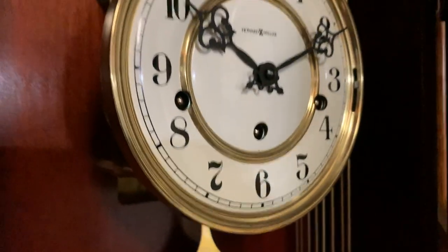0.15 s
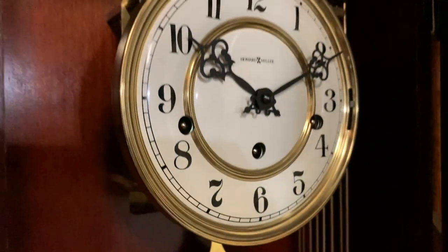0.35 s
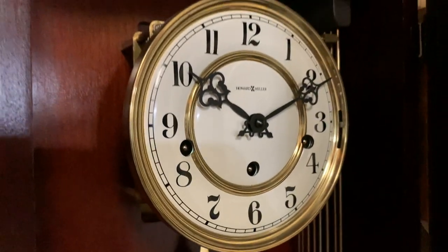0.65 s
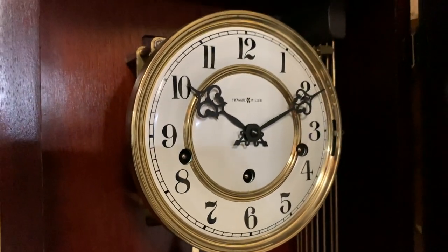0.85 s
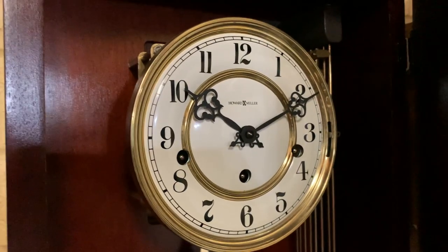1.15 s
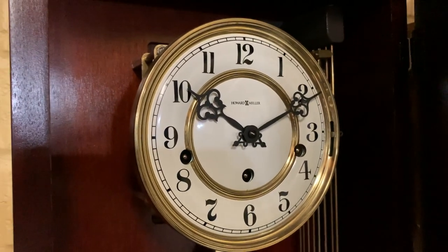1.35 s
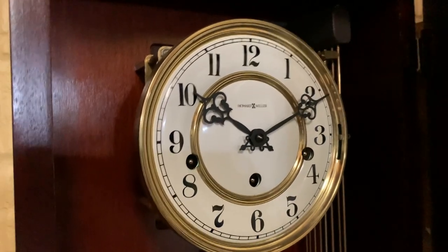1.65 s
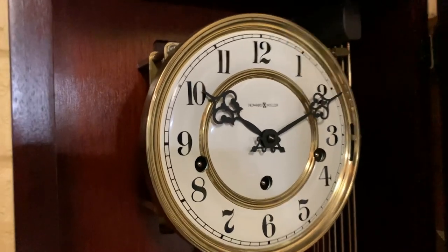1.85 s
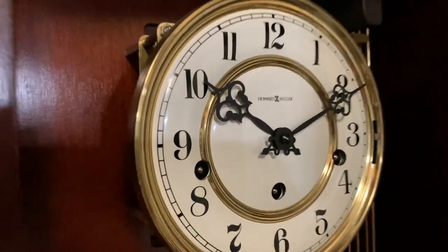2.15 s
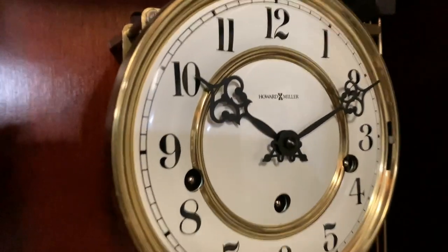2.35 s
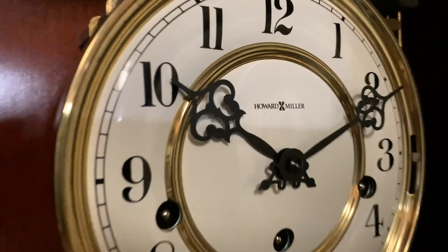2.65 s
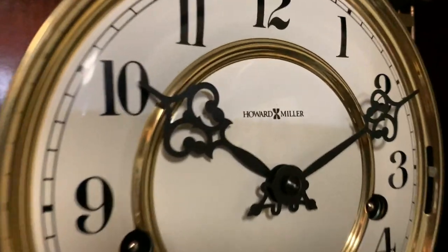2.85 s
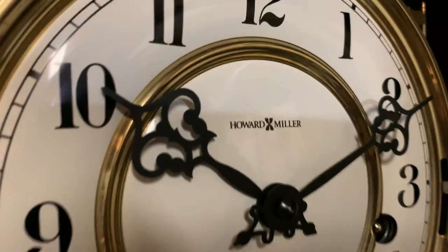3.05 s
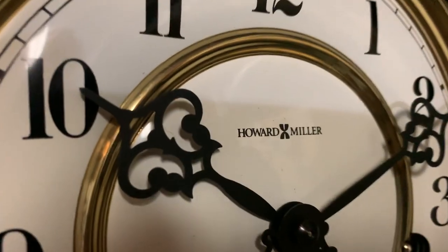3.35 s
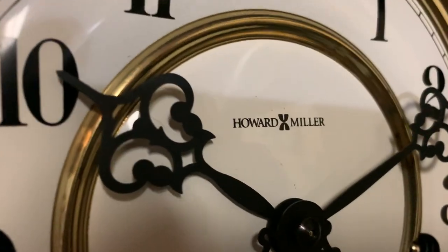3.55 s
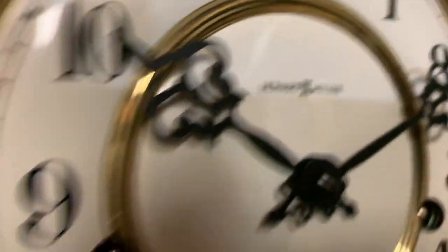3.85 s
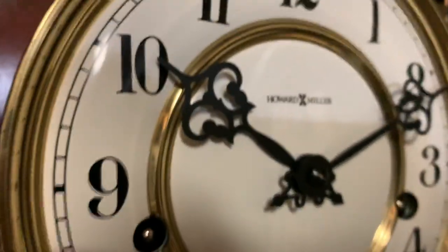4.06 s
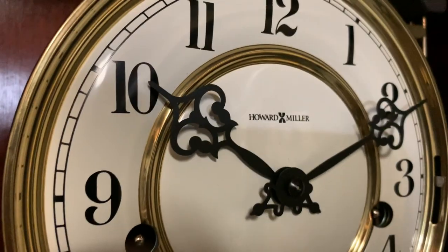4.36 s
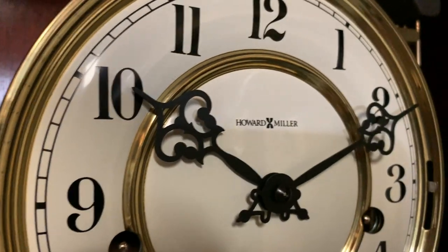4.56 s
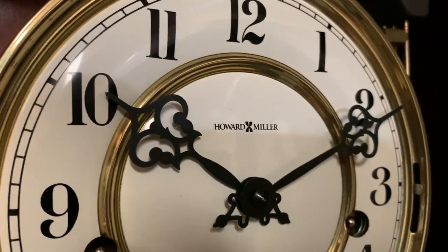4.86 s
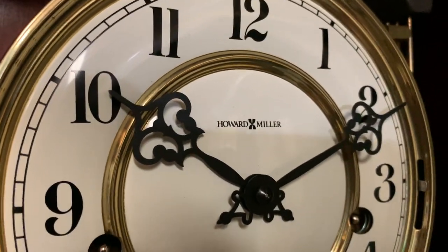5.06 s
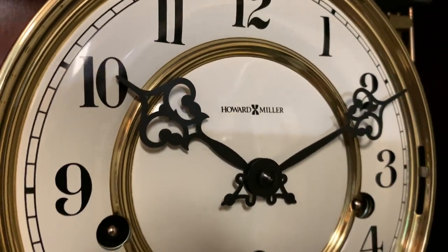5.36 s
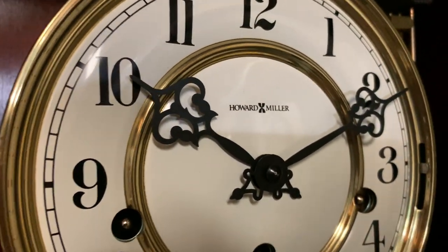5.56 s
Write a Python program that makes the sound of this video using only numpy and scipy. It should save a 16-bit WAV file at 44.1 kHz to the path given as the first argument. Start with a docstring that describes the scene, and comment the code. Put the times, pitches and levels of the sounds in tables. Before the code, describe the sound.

A pendulum wall clock ticks close by among other ticking clocks, over a low hum, with a few creaks and knocks of camera handling.

```python
"""From the start, a pendulum wall clock ticks close by: a tooth hits a steel catch and shakes the case.
Around it a neighbour clock pings, far clocks tick through the room's echo and a motor hums near 59 Hz.
From about two seconds on, a hand-held camera creaks and rumbles as the hand moves on it,
and the bass grows louder and moves to the centre. Near four seconds the hand slides and a few
quick knocks sound. The clocks tick on to the end over soft room noise."""
import sys
import numpy as np
from scipy import signal
from scipy.fft import rfft, irfft, next_fast_len
from scipy.io import wavfile
from scipy.ndimage import uniform_filter1d, map_coordinates

SR = 44100
rng = np.random.default_rng(int(sys.argv[2]) if len(sys.argv) > 2 else 0)


def persist_wave(psi):
    """Save psi, clipped to +-1, as 16-bit WAV."""
    counts = np.round(np.clip(psi, -1, 1) * 32767).astype(np.int16)
    wavfile.write(sys.argv[1], SR, np.atleast_2d(counts).T)


N = 251811

# Levels are relative. fade_s is the time to die away by 60 dB; pan_db is left minus right.
# Ticks of the near clock: start_s, steel_db, case_low_db, case_middle_db, case_high_db, backboard_db
NEAR_TICKS = [(0.1275, -44, -63, -59, -60.5, -64), (0.6867, -47, -64, -61.5, -64.5, -66),
              (1.3112, -46.5, -61, -65.5, -64, -72), (1.8687, -45.5, -59.5, -59, -65.5, -66),
              (2.4951, -42.5, -61, -58.5, -56.5, -64), (3.0493, -44.5, -62, -57, -61, -54),
              (3.678, -47.5, -57, -58.5, -59, -43), (4.234, -45.5, -61, -59, -60, -49),
              (4.8617, -47, -59.5, -59.5, -56, -50), (5.4161, -46.5, -58, -58.5, -60, -49)]
# Its two catches, which take turns: treble_db, plate_db, case_low_delay_s, backboard_delay_s
CATCHES = [(0.7, 8.5, .001, .022), (4, -1, .0025, 0.0041)]
# The tones its parts ring with: pitch_hz, level_db, fade_s
STEEL_TONES = [(8900, -30, .015), (10440, -3, 0.022), (10680, -3, 0.034), (10750, 0.5, 0.032),
               (10870, -6.5, 0.035), (11060, -15, 0.038), (12600, -10, .015), (14500, -3, 0.017),
               (15000, 0, 0.023), (15400, 1, 0.022), (15700, -5, .02), (15800, -11, .015)]  # catch and toothed wheel
CASE_TONES = [(570, -7, .04), (880, -6, .035), (1040, 0, .04), (1100, -2, .035), (1250, -5, .03),
              (1750, -5, .03), (1980, -1, .04), (2100, 0, .045), (2350, -5, .03), (2830, -4, .025),
              (3150, -7, .025), (3480, -1, .022), (3750, -8, .025)]
PLATE_TONES = [(3450, 1, .03), (3570, -2, .025)]  # bright metal plates
KNOCK_TONES = [(2050, 11, .04), (1950, 5, .03)]  # woody knock of the case
BACKBOARD_TONES = [(247, -2, 0.2), (268, 0, .17), (290, -2, 0.12)]  # deep boom of the case
# Pings of the neighbour clock: start_s, high_db, pan_db, echo_db, low_db
NEIGHBOUR_PINGS = [(0.165, -50, -2.1, -64, -66), (0.4352, -60, 3, -49, -62), (0.916, -43, 2, -54, -52),
                   (1.462, -47, -2.1, -55, -51.5), (1.947, -44, 7, -52, -50), (2.977, -57, -1.5, -52, -59),
                   (3.5043, -66, 0.1, -52, -68), (4.007, -50, 2.1, -46, -50), (4.563, -56, 13, -52, -58),
                   (5.038, -55, 9, -49.5, -48), (5.5878, -56, 8, -55, -58)]
# Its high and low tones: pitch_hz, level_db, fade_s
PING_HIGH_TONES = [(3740, -3, .026), (3860, -3, .026), (3790, -18, .12)]
PING_LOW_TONES = [(2300, -0.5, 0.048), (2390, -6, 0.043)]
# Steady far clocks: first_s, period_s, low_hz, high_hz, treble_db, fade_s, ring_db, levels_db (per tick)
FAR_CLOCKS = [(0.266, 1.0345, 1900, 3800, -24, 0.44, 14, [-50.5, -57, -60, -51.5, -50, -62]),
              (0.747, 1.0345, 1510, 3800, -27.5, 0.43, 11.5, [-49.5, -52, -51.5, -48.5, -53.5]),
              (0.330, 0.9105, 1500, 3800, -27, 0.23, 7, [-51.5, -49, -52.5, -57, -51, -53]),
              (0.790, 0.9095, 1500, 2700, -24, 0.21, 2, [-61, -51.5, -50, -51, -63, -51]),
              (0.503, 1.0005, 1750, 3620, -21, 0.36, 13.5, [-48.5, -53.5, -49.5, -52.5, -46.5, -46]),
              (0.811, 1.003, 946, 3570, -21, 0.7, 23, [-55, -52.5, -58.5, -55, -56]),
              (0.407, 0.999, 1690, 3600, -21.5, 0.53, 10, [-50.5, -53, -51, -62.5, -58, -57.5]),
              (0.070, 0.990, 1600, 4650, -11.5, 0.29, 19, [-57, -59, -59, -56, -53, -58]),
              (0.209, 0.9415, 1400, 3500, -24, 0.38, 16.5, [-55, -54, -52.5, -55, -60, -71])]
# Lone far ticks and brief rustles, one leading into a near tick:
# start_s, level_db, low_hz, treble_db, fade_s
LONE_TICKS_AND_RUSTLES = [(0.682, -49, 2100, -25, .1), (1.387, -47.5, 1140, -7, 0.077),
                          (1.561, -57.5, 1920, -34, 0.98), (1.651, -50, 800, -29, 0.16),
                          (1.992, -47.5, 2180, -34, 0.13), (2.907, -57.5, 2030, -16, 0.57),
                          (3.227, -57, 710, -17, 0.26), (3.255, -52, 1910, -29, 0.16),
                          (3.306, -55, 750, -29, 0.3), (3.606, -48.5, 2170, -18, 0.075),
                          (4.07, -50.5, 1020, -27, 0.59), (4.15, -46, 760, -28, 0.16),
                          (4.201, -55, 2370, -25, 0.22), (4.374, -55, 1820, -21, 0.51),
                          (4.648, -49.5, 1810, -34, 0.19), (4.718, -49, 2040, -11, 0.068),
                          (5.009, -49.5, 800, -27, 0.34), (5.149, -53, 2100, -15, 0.12),
                          (5.238, -53, 2640, -28, 0.3), (5.385, -49.5, 1800, -22, 0.32)]
# Tone colour of a far tick, and of bright hiss: pitch_hz, level_db
FAR_TICK_COLOUR = [(210, -43), (350, -8.5), (558, -4.5), (647, -8.5), (749, -4.5), (952, -9), (3480, -12.5),
                   (6600, -16), (8500, -30.5), (11000, -84), (18700, -120)]
TREBLE_COLOUR = [(5000, -45), (8500, -19), (9680, -4.5), (11900, -5.5), (12900, -8), (13300, -8),
                 (15200, -15), (16200, -28), (16500, -51)]
# Short, direct rings of the far clocks' ticks: start_s, level_db, pitch_hz, fade_scale_s
FAR_TICK_RINGS = [(0.082, -59, 1600, .06), (0.265, -55, 1850, .08), (0.335, -51, 2320, 0.14),
                  (0.35, -52, 1040, 0.14), (0.408, -50, 1840, .08), (0.504, -52, 1510, .06),
                  (0.52, -58, 1770, 0.073), (0.747, -50, 2330, .06), (0.75, -53, 4500, .07),
                  (0.807, -51, 2100, 0.086), (0.812, -48, 800, 0.084), (1.053, -59, 5620, 0.11),
                  (1.055, -60, 4650, .08), (1.058, -60, 3020, .07), (1.062, -54, 1690, 0.069),
                  (1.145, -51, 1490, .06), (1.242, -50, 2210, 0.078), (1.243, -55, 4900, 0.088),
                  (1.296, -50, 4570, 0.053), (1.412, -56, 1610, .05), (1.561, -53, 1940, .06),
                  (1.643, -52, 4080, .05), (1.7, -51, 2300, 0.078), (1.782, -51, 4580, 0.041),
                  (1.84, -54, 950, .07), (1.992, -54, 2290, .06), (2.062, -55, 1640, .05),
                  (2.088, -54, 3530, 0.088), (2.153, -47, 2340, 0.069), (2.245, -55, 1920, .08),
                  (2.608, -53, 2295, 0.1), (2.81, -52, 1890, 0.093), (2.845, -53, 1650, .07),
                  (2.905, -51, 2000, 0.11), (3.255, -49, 1880, .04), (3.307, -51, 787, 0.14),
                  (3.368, -52, 4700, 0.075), (3.368, -65, 1990, 0.089), (3.37, -46.5, 816, 0.095),
                  (3.5, -54, 1510, 0.092), (3.52, -51, 3700, .06), (3.606, -51, 2150, 0.054),
                  (3.824, -57, 3640, .05), (3.966, -47, 2350, 0.067), (3.966, -51, 5020, 0.055),
                  (4.404, -56, 1830, 0.057), (4.425, -55, 2700, .05), (4.505, -53, 1950, .06),
                  (4.53, -51, 3400, 0.066), (4.66, -52, 1940, 0.077), (4.718, -54, 1950, .07),
                  (5.009, -54, 2530, 0.06), (5.13, -55, 3500, 0.092), (5.338, -54, 2820, 0.078),
                  (5.36, -54, 4650, 0.06), (5.405, -52, 2000, .04), (5.507, -56, 1930, 0.063)]
# Slips in the camera body: start_s, push_db, grit_db
SLIPS = [(0.102, -48.5, -54.5), (2.148, -46, -51), (2.19, -51, -60), (2.215, -45.5, -56), (2.243, -49, -53),
         (2.27, -49, -51.5), (2.292, -56, -60), (2.324, -51, -56), (2.361, -47, -56), (2.42, -46, -49),
         (2.455, -47, -51), (2.478, -51, -53), (2.509, -38, -49), (2.569, -46.5, -55), (2.624, -47, -54),
         (2.687, -46, -56.5), (2.793, -52, -51.5), (2.881, -45, -49), (2.987, -43, -51), (3.075, -45, -51),
         (3.779, -48, -53.5), (4.004, -43.5, -58), (4.034, -48, -48), (4.04, -33.5, -38), (4.059, -45, -52),
         (4.463, -44, -49)]
# Tones of the camera's shell: pitch_hz, level_db, fade_s
SHELL_TONES = [(292, -5, 0.026), (440, -6, 0.03), (590, -4, 0.035)]
# Quick knocks on the camera: start_s, level_db, pitch_hz, click_db
CAMERA_TAPS = [(4.113, -45, 900, -25), (4.1167, -38, 1000, -22), (4.124, -30.5, 1195, -24),
               (4.1315, -36, 1080, 3), (4.143, -43, 1100, -20)]
# Slides of the hand: start_s, length_s, level_db
HAND_SLIDES = [(3.813, 0.15, -65.5), (4.028, 0.15, -68.5)]
# Loudness of the bass over time: time_s, hum_db, drone_db, rumble_db
BASS_LEVELS = [(0, -46.5, -61.5, -56.5), (2.1, -48, -65.5, -58), (2.6, -43.5, -59.5, -55.5),
               (3.5, -43, -58, -53), (5.71, -43, -57, -56)]
# The bass moves to the centre: time_s, centred (0 to 1), rumble_alike_on_both_sides (0 to 1)
BASS_CENTRING = [(0, 0, 0), (2.05, 0, 0), (2.3, 1, 0), (2.55, 1, .2), (2.85, 1, 1), (5.71, 1, 1)]
# Tones of the motor hum and the drone above it: pitch_hz, level_db, waver_db
HUM_TONES = [(59.13, 1, 0.3), (46.4, -21.5, 2.5), (118.3, -20.5, 1.9), (177.2, -22.5, 2.5),
             (296.2, -31.5, 2.5)]
DRONE_TONES = [(185.45, 0, 1.8), (236.9, -9, 4.5), (282.5, -13, 4.5)]
# Tone colour of the rumble: pitch_hz, level_db
RUMBLE_COLOUR = [(20, -30), (33, -8), (45, -3.5), (62, 1), (72, 6), (90, -1), (130, -6), (160, -4.5),
                 (210, -6.5), (300, -12), (360, -20), (500, -28), (1000, -120)]
# The rumble swells as the hand moves: time_s, boost_db; then the half width of a swell
SWELLS, SWELL_S = [(1.5, 3.9), (2.22, 7)], 0.14
# Soft low thumps: start_s, level_db, pitch_hz
SOFT_THUMPS = [(0.72, -58, 272), (1.19, -58, 237), (1.29, -60, 425), (2.89, -54, 235), (3.19, -55, 285),
               (3.28, -51, 240), (3.44, -50, 85), (3.99, -48, 105), (4.5, -52, 268), (4.99, -55, 258)]
# Tone colour of the room noise: pitch_hz, level_db
ROOM_COLOUR = [(210, -53), (350, 2), (541, 4), (636, -12), (747, -1.5), (1900, -7.5), (3740, -10),
               (7370, -22), (8520, -34.5), (9690, -23.5), (11600, -18.5), (13200, -54), (15500, -19),
               (16500, -69)]
# How patchy that noise is: pitch_hz, depth_db
ROOM_PATCHES = [(500, 2), (1200, 4.5), (5000, 4.5), (9000, 1.5)]
# Loudness of the blur of farthest clocks, and of the faint hiss: time_s, level_db
BLUR_LEVELS = [(0.0, -74.5), (0.11, -73.5), (0.27, -64.5), (0.37, -64), (0.92, -69), (1.14, -68.5),
               (1.43, -64), (1.97, -63.5), (2.15, -67), (2.81, -70.5), (2.96, -66.5), (3.15, -69),
               (3.82, -68.5), (4.05, -61.5), (4.83, -70), (5.47, -65.5), (5.61, -69), (5.71, -70.5)]
HISS_LEVELS = [(0.0, -85), (0.33, -83), (0.56, -85), (2.64, -84), (3.62, -85), (4.01, -82), (4.82, -85),
               (5.37, -84), (5.71, -87)]
# How long the room echoes: pitch_hz, fade_s
ECHO_FADES = [(500, 0.25), (2000, 0.16), (6000, 0.26), (12000, 0.05), (15500, 0.079)]

DETUNE = 0.0084  # the near clock's pitches shift by about this fraction from tick to tick
BRIGHTEN_DB_PER_S = 1  # the steel's treble grows as the camera comes closer
FAR_PAN_DB, TURN_DB_PER_S = -0.5, .5  # the far clocks drift left as the camera turns
LONE_HIGH_HZ, LONE_RING_DB = 2800, 7.5  # shared by the lone ticks and rustles
PUSH_END_HZ, PUSH_EXTRA_CYCLES, PUSH_FALL_S, PUSH_DELAY_S = 190, 2.4, .0019, 0.001504
HISS_FROM_HZ, TOP_HZ = 8500, 16600


def near_clock():
    """A tooth strikes a catch; the steel rings, the case shakes and the room echoes."""
    out, t = np.zeros((2, N)), np.arange(SR // 8) / SR
    for k, (start_s, steel_db, low_db, middle_db, high_db, boom_db) in enumerate(NEAR_TICKS):
        treble_db, plate_db, low_delay_s, boom_delay_s = CATCHES[k % 2]
        steel = gain(steel_db - 8) * steel_strike(t, treble_db - 2.5 + BRIGHTEN_DB_PER_S * start_s)
        case = wooden_case(t, low_db, middle_db, high_db, plate_db, low_delay_s)
        boom = gain(boom_db) * ring(BACKBOARD_TONES, t, scatter_db=2, rise_s=0.0081)
        boom *= np.hanning(2 * len(t))[len(t):]
        add(out, start_s - .001, steel + case)
        add(out, start_s + boom_delay_s, boom[None])
        add(out, start_s + 0.0064, gain(-10.5) * echo(steel) + gain(-11) * echo(case))
    return out


def steel_strike(t, treble_db):
    """Steel hits steel with a bright ring and a crack, then bounces once."""
    noise = rng.standard_normal(len(t))
    crack = filtered(noise, lambda f: resonance(f, 10770, 2000) - 0.2 * resonance(f, 14000, 3600))
    crack *= gain(14.5) * fade(t, 0.036) * rise(t, 0.0013)
    strike = ring(detuned(STEEL_TONES), t, scatter_db=4.5, rise_s=0.001) + crack
    bounce = filtered(strike, lambda f: resonance(f, 10900, 1200))
    strike += gain(-10) * np.roll(bounce, round(.007 * SR))
    strike = filtered(strike, lambda f: gain(at_pitch([(12500, 0), (13500, treble_db)], f)))
    return np.array([np.roll(strike, 8), strike])  # reaches the right side first


def wooden_case(t, low_db, middle_db, high_db, plate_db, low_delay_s):
    """The gears rattle briefly and shake the wide case, which sounds different on each side."""
    short_t = t[:SR // 40]
    rattle = rng.standard_normal((2, len(short_t))) * fade(short_t, .022) * rise(short_t, 0.0015)
    rattle[:, 20] += 1.8 * np.abs(rattle).max()  # the first blow stands out
    tones = ring(detuned(CASE_TONES), t, scatter_db=3, rise_s=0.0022)
    wood = signal.fftconvolve(tones[None], rattle, axes=1)[:, :len(t)]
    clack = filtered(rng.standard_normal((2, len(t))), lambda f: resonance(f, 2040, 2600) ** 2)
    clack *= fade(t, 0.084) * rise(t, 0.0041)
    blow = normalised(wood) + gain(-6) * normalised(clack)
    # each range of pitches takes its own share of the blow
    bands = [(200, 1500, low_db, low_delay_s), (1500, 2550, middle_db, 0), (2550, 8000, high_db, 0)]
    case = 0
    for from_hz, to_hz, share_db, delay_s in bands:
        band = filtered(blow, lambda f: ((f >= from_hz) & (f < to_hz)) * np.exp(-2j * np.pi * f * delay_s))
        case += gain(share_db) * normalised(band)
    for part, level_db, rise_s in (PLATE_TONES, high_db + plate_db, 0.0026), (KNOCK_TONES, middle_db, 0.0012):
        case += gain(level_db) * np.array([ring(part, t, 1.5, rise_s) for side in range(2)])
    return case * pan(0.85)[:, None]


def neighbour_clock():
    """A ping with an echo: low tones, and two close high ones that cancel at first and so swell."""
    out, t = np.zeros((2, N)), np.arange(SR // 5) / SR
    for start_s, high_db, pan_db, echo_db, low_db in NEIGHBOUR_PINGS:
        high = 0
        for k, (hz, level_db, fade_s) in enumerate(PING_HIGH_TONES):
            strength = gain(level_db + rng.normal()) * fade(t, fade_s)
            high += strength * np.sin(2 * np.pi * (hz * t + k / 2 + 0.054 * rng.normal()))
        high *= gain(high_db + 4.5) * rise(t, 0.0023)
        low = gain(low_db) * ring(PING_LOW_TONES, t, scatter_db=1, rise_s=0.0017)
        add(out, start_s, (high + low) * pan(pan_db)[:, None])
        add(out, start_s + 0.006, gain(echo_db - high_db) * echo(high) + gain(-3) * echo(low))
    return out


def far_clocks():
    """A far tick is mostly echo: a dying rush with tones standing out. Brief rustles are made alike."""
    out, t = np.zeros((2, N)), np.arange(SR // 3) / SR
    events = [(first_s + k * period_s, level_db, *voice)
              for first_s, period_s, *voice, levels_db in FAR_CLOCKS
              for k, level_db in enumerate(levels_db)]
    events += [(start_s, level_db, low_hz, LONE_HIGH_HZ, treble_db, fade_s, LONE_RING_DB)
               for start_s, level_db, low_hz, treble_db, fade_s in LONE_TICKS_AND_RUSTLES]
    for start_s, level_db, low_hz, high_hz, treble_db, fade_s, ring_db in events:
        weak_hz = np.exp(rng.uniform(np.log(1000), np.log(6700), size=6))

        def colour(f):
            """Two strong tones and six weaker random ones on top of the rush."""
            strong = gain(ring_db) * (abs(resonance(f, low_hz, 45)) + abs(resonance(f, high_hz, 61)))
            weak = 3 * sum(abs(resonance(f, hz, 46)) for hz in weak_hz)
            return gain(at_pitch(FAR_TICK_COLOUR, f)) * (1 + strong + weak)

        noise = rng.standard_normal((2, len(t)))
        noise[1] = .6 * np.roll(noise[0], 18) + .8 * noise[1]  # part reaches the left side first
        rush = normalised(filtered(noise, colour))
        rush += gain(treble_db) * normalised(filtered(noise, lambda f: gain(at_pitch(TREBLE_COLOUR, f))))
        # the room swallows the high part sooner
        rush += (fade(t, .5) - 1) * filtered(rush, lambda f: 1 / (1 + (3500 / (f + 1)) ** 4))
        rush *= gain(level_db + 1.5) * fade(t, np.clip(fade_s, .05, .9)) * rise(t, 0.012)
        add(out, start_s - .003, rush * pan(FAR_PAN_DB + TURN_DB_PER_S * start_s)[:, None])
    return out


def far_tick_rings():
    """The short ring of a far tick arrives directly, then many more times off nearby walls."""
    out, t = np.zeros((2, N)), np.arange(SR // 8) / SR
    for start_s, level_db, hz, scale_s in FAR_TICK_RINGS:
        tones = [(hz, 0, 0.5 * scale_s), (1.04 * hz, -4, 0.48 * scale_s),
                 (0.95 * hz, -5, 0.34 * scale_s), (1.11 * hz, -8, 0.3 * scale_s)]
        direct = ring(tones, t, scatter_db=2.5, rise_s=0.0024)
        delays_s = rng.uniform(.003, .06, (2, 18))
        bounces = gain(-2.5) * fade(delays_s, 2.8 * scale_s) * rng.choice([-1, 1], delays_s.shape)
        paths = np.zeros((2, SR // 16))
        paths[:, 0] = 1
        paths[[[0], [1]], (delays_s * SR).astype(int)] = bounces
        paths /= np.linalg.norm(paths, axis=1, keepdims=True)
        add(out, start_s, gain(level_db + 3) * signal.fftconvolve(direct[None], paths, axes=1))
    return out


def camera_creaks():
    """Each slip is a gritty rub, a push whose pitch falls fast and a short knock of the shell."""
    out, t = np.zeros((2, N)), np.arange(SR // 8) / SR
    delay = round(PUSH_DELAY_S * SR)
    cycles = PUSH_END_HZ * t + PUSH_EXTRA_CYCLES * (1 - np.exp(-t / PUSH_FALL_S))
    push = gain(3) * np.sin(2 * np.pi * cycles) * fade(t, 0.046) * rise(t, 0.0042)
    for start_s, push_db, grit_db in SLIPS:
        knock = gain(-5.5) * ring(SHELL_TONES, t, scatter_db=3.5, rise_s=0.0044)
        noise = rng.standard_normal((3, len(t)))  # left, right, shared
        grit = normalised(filtered(noise[:2] + 0.81 * noise[2], lambda f: resonance(f, 1260, 2100) ** 2))
        grit *= (gain(-2) * fade(t, 0.013) + gain(-11.5) * fade(t, 0.12)) * rise(t, 0.00093)
        grit += gain(5) * np.roll(click(t, 1200, 1500), delay)
        creak = gain(push_db) * np.roll(push + knock, delay) + gain(grit_db) * grit
        add(out, start_s, muffled(creak, 2800))
    return out


def camera_taps():
    """Quick, higher knocks: each is a click and a very short ring."""
    out, t = np.zeros((2, N)), np.arange(SR // 8) / SR
    for start_s, level_db, hz, click_db in CAMERA_TAPS:
        tones = [(hz, 0, .022), (0.8 * hz, -4, .02), (1.23 * hz, -6, .015)]
        knock = ring(tones, t, scatter_db=0.2, rise_s=0.0011) * pan(1.5)[:, None]
        edge = gain(click_db) * muffled(click(t, 1600, 2200), 3600)
        add(out, start_s, gain(level_db) * (knock + edge))
    return out


def hand_slides():
    """Skin slides on the shell: a soft, bright hiss that swells and fades."""
    out = np.zeros((2, N))
    for start_s, length_s, level_db in HAND_SLIDES:
        hiss = filtered(rng.standard_normal((2, round(length_s * SR))),
                        lambda f: gain(at_pitch(TREBLE_COLOUR, f)) + 1.5 * abs(resonance(f, 5600, 2500)) ** 2)
        add(out, start_s, gain(level_db) * normalised(hiss) * np.hanning(hiss.shape[1]) ** .5)
    return out


def hum_and_rumble():
    """A motor hums, a drone wavers above it, and a low rumble swells when the hand moves."""
    t = np.arange(N) / SR
    hum_db, drone_db, rumble_db = over_time(BASS_LEVELS)
    swell_db = sum(boost_db * np.exp(-((t - time_s) / SWELL_S) ** 2) for time_s, boost_db in SWELLS)
    leftness, width = 1 - np.array(over_time(BASS_CENTRING))
    middle, side = rng.standard_normal((2, N))
    noise = middle + 0.36 * width * side * [[1], [-1]]
    rumble = normalised(filtered(noise, lambda f: gain(at_pitch(RUMBLE_COLOUR, f))))
    rumble *= gain(rumble_db + swell_db + wobble(8.6))
    hum = gain(hum_db) * wavering(HUM_TONES, .5 * leftness)
    drone = gain(drone_db) * wavering(DRONE_TONES, .5 * leftness)
    return pan(4.4 * leftness) * hum + pan(2 * leftness) * (drone + rumble)


def soft_thumps():
    """Two close, low tones swell briefly out of the hum."""
    out, t = np.zeros((2, N)), np.arange(round(.13 * SR)) / SR
    for start_s, level_db, hz in SOFT_THUMPS:
        thump = ring([(hz, 0, .5), (1.07 * hz, -7, .4)], t, scatter_db=1, rise_s=.002)
        add(out, start_s, gain(level_db) * thump[None] * np.hanning(len(t)))
    return out


def room_noise():
    """A faint hiss and the patchy blur of clocks too far away to tell apart."""
    hz, _, spectrum = signal.stft(rng.standard_normal((2, N)), SR, nperseg=512)
    patches = uniform_filter1d(rng.standard_normal(spectrum.shape[1:]), 4, axis=0)  # smooth over pitch
    patches = normalised(uniform_filter1d(patches, 10, axis=1))  # and over time
    spectrum *= gain(at_pitch(ROOM_PATCHES, hz)[:, None] * patches)
    noise = signal.istft(spectrum, nperseg=512)[1][:, :N]
    # long waves reach both sides alike
    noise += filtered(noise[::-1] - noise, lambda f: .5 / (1 + (f / 450) ** 4))
    blur = filtered(noise, lambda f: gain(at_pitch(ROOM_COLOUR, f)) * (f <= HISS_FROM_HZ))
    hiss = filtered(noise, lambda f: gain(at_pitch(ROOM_COLOUR, f)) * (f > HISS_FROM_HZ))
    blur_db = over_time(BLUR_LEVELS)[0] + 2.5 + 2.2 * wobble(7)
    hiss_db = over_time(HISS_LEVELS)[0] + 1.5 + 1.6 * wobble(7)
    return gain(blur_db) * normalised(blur) + gain(hiss_db) * normalised(hiss)


def echo(sound):
    """The room's answer, new for each hit: every pitch dies away at its own speed."""
    hz, t, spectrum = signal.stft(rng.standard_normal((2, SR // 3)), SR, nperseg=256)
    tail = signal.istft(spectrum * fade(t, at_pitch(ECHO_FADES, hz)[:, None]), SR, nperseg=256)[1]
    return signal.fftconvolve(np.atleast_2d(sound), tail / np.linalg.norm(tail[0]), axes=1)


def ring(tones, t, scatter_db, rise_s):
    """A struck object: fading tones whose strengths vary from hit to hit."""
    sound = 0
    for hz, level_db, fade_s in tones:
        strength = gain(level_db + scatter_db * rng.normal()) * fade(t, fade_s)
        sound += strength * np.sin(2 * np.pi * (hz * t + rng.random()))
    return sound * rise(t, rise_s)


def detuned(tones):
    """The same tones, each nudged in pitch at random."""
    return [(hz * (1 + DETUNE * rng.normal()), level_db, fade_s) for hz, level_db, fade_s in tones]


def wavering(tones, lead_rad):
    """Unsteady held tones; the left wave runs ahead of the right by lead_rad."""
    t, offsets = np.arange(N) / SR, np.array([lead_rad / 2, -lead_rad / 2])
    sound = 0
    for hz, level_db, waver_db in tones:
        strength = gain(level_db + waver_db * wobble(9))
        sound += strength * np.sin(2 * np.pi * hz * t + 0.26 * waver_db * wobble(6.8) + offsets)
    return np.sqrt(2) * sound


def click(t, hz, width_hz):
    """One sharp contact, centred on hz, with a peak of 1."""
    pulse = filtered((t == 0) * 1., lambda f: resonance(f, hz, width_hz) ** 2)
    return pulse / np.abs(pulse).max()


def gain(db):
    """Turn decibels into a multiplier."""
    return 10 ** (np.asarray(db) / 20)


def fade(t, fade_s):
    """Fall by 60 dB every fade_s."""
    return gain(-60 * t / fade_s)


def rise(t, rise_s):
    """Climb smoothly from 0 towards 1."""
    return 1 - np.exp(-t / rise_s)


def normalised(sound):
    """Scale to an average (rms) level of 1."""
    return sound / np.sqrt(np.mean(sound ** 2) + 1e-20)


def at_pitch(table, hz):
    """Read between the rows of a (pitch_hz, value) table."""
    pitches, values = np.transpose(table)
    return np.interp(np.log(hz + 1), np.log(pitches + 1), values)


def over_time(table):
    """One value per sample for each column after time_s."""
    times, *columns = np.transpose(table)
    return [np.interp(np.arange(N) / SR, times, column) for column in columns]


def wobble(rate_hz):
    """A smooth curve through rate_hz random points a second."""
    return map_coordinates(rng.standard_normal(int(N * rate_hz / SR) + 4), [np.arange(N) * rate_hz / SR])


def filtered(sound, response):
    """Multiply each frequency f in the sound by response(f)."""
    size = next_fast_len(sound.shape[-1] + 4096)
    spectrum = rfft(sound, size) * response(np.fft.rfftfreq(size, 1 / SR))
    return irfft(spectrum, size)[..., :sound.shape[-1]]


def muffled(sound, hz):
    """Soften the pitches above hz."""
    return filtered(sound, lambda f: 1 / (1 + 1j * f / hz) ** 2)


def resonance(f, hz, width_hz):
    """A filter shape that lets through the pitches near hz."""
    return 1j * f * width_hz / (hz * hz - f * f + 1j * f * width_hz)


def pan(pan_db):
    """Left and right multipliers; positive leans left."""
    return gain(np.array([pan_db / 2, -pan_db / 2]))


def add(track, start_s, sound):
    """Mix a sound into the track at start_s."""
    part = track[:, round(start_s * SR):][:, :sound.shape[1]]
    part += sound[:, :part.shape[1]]


def scene():
    """The clocks, the handled camera and the room, together in stereo."""
    clocks = near_clock() + neighbour_clock() + far_clocks() + far_tick_rings()
    knocks = camera_creaks() + camera_taps()
    return clocks + knocks + hum_and_rumble() + soft_thumps() + room_noise() + hand_slides()


def record(dry):
    """Cut everything above TOP_HZ."""
    return filtered(dry, lambda hz: hz < TOP_HZ)


dry = scene()
out = record(dry)
persist_wave(out)
```